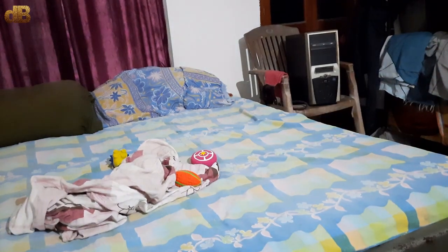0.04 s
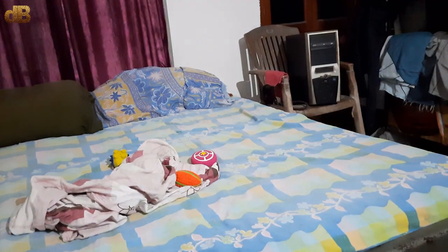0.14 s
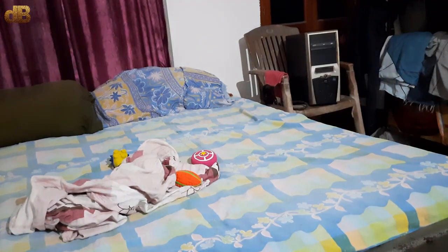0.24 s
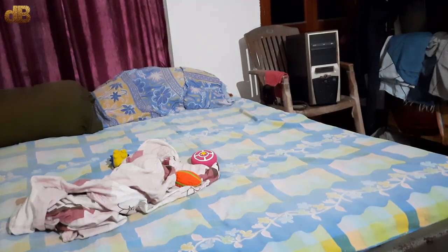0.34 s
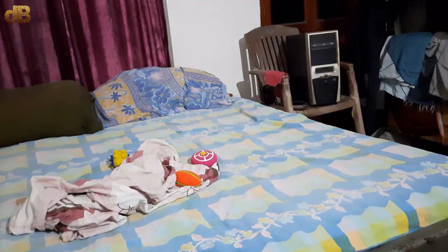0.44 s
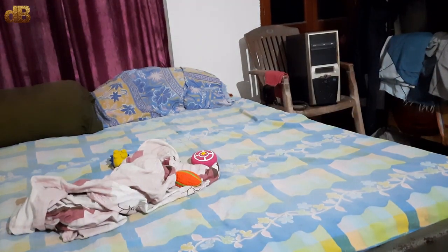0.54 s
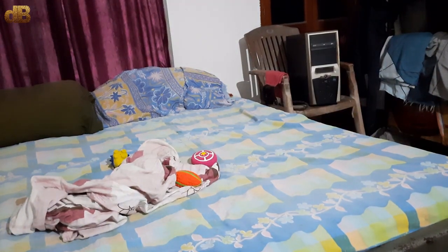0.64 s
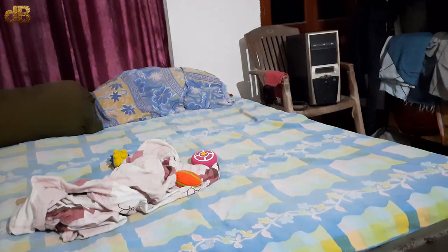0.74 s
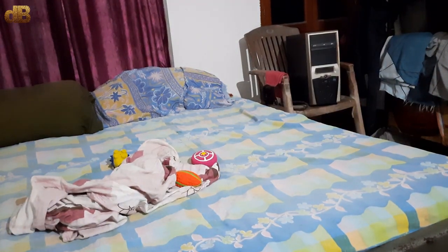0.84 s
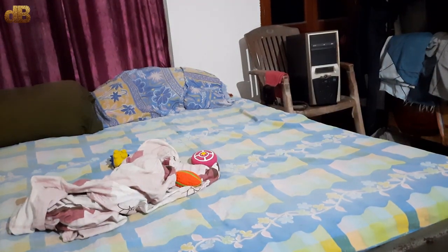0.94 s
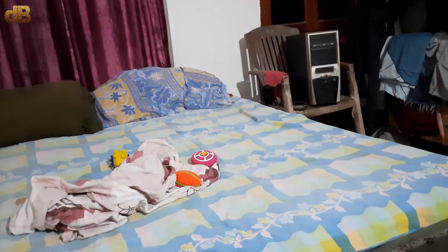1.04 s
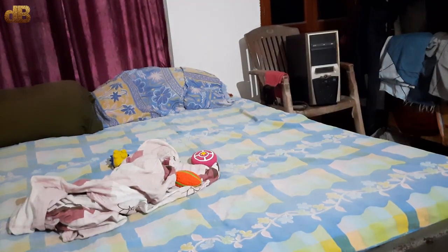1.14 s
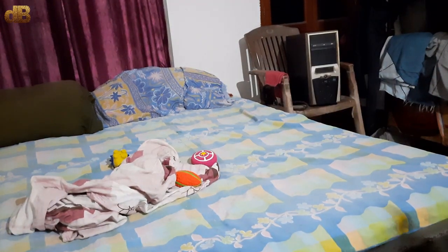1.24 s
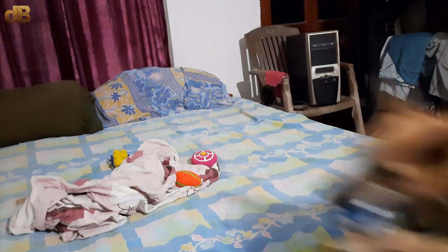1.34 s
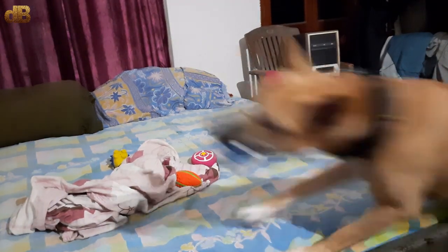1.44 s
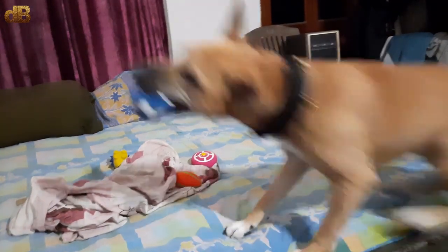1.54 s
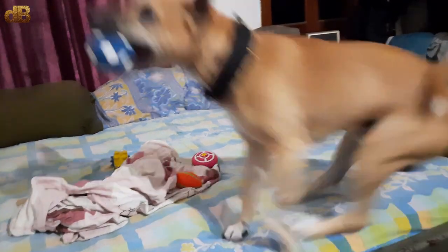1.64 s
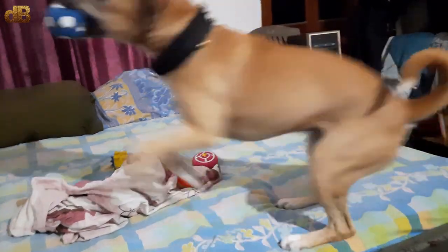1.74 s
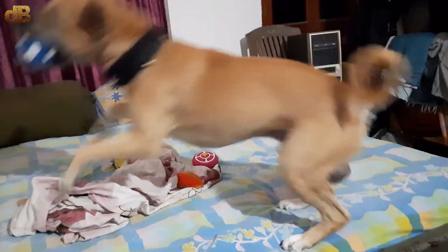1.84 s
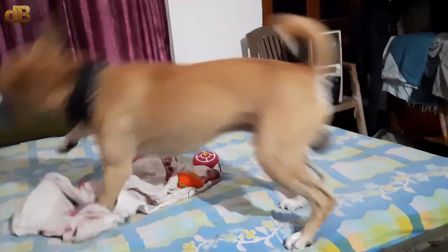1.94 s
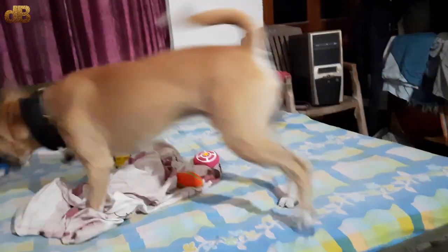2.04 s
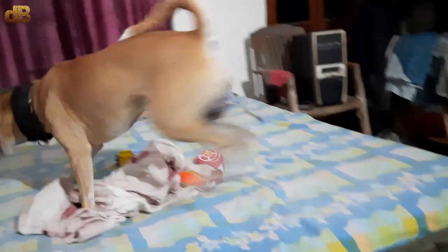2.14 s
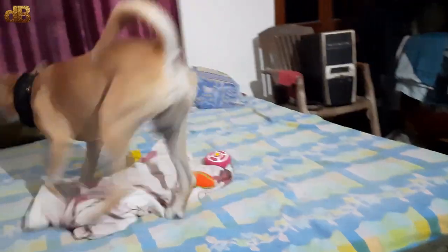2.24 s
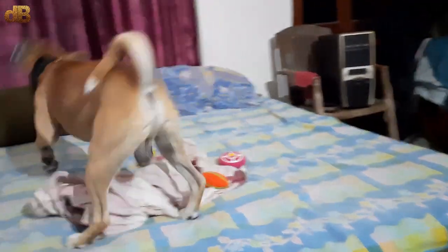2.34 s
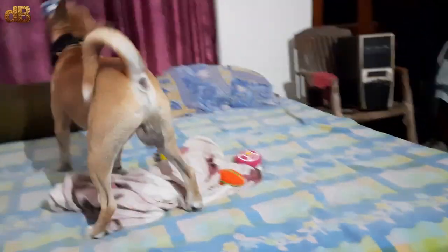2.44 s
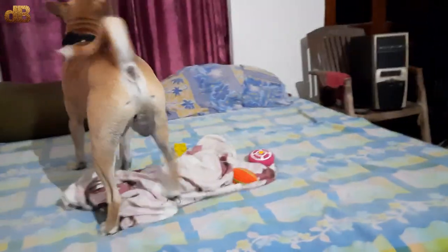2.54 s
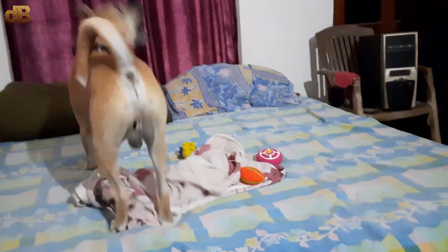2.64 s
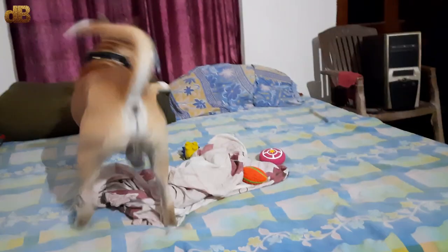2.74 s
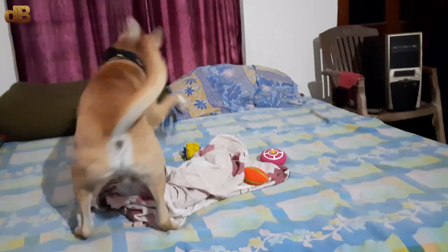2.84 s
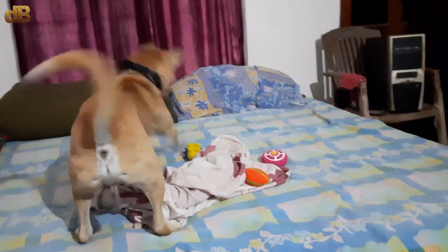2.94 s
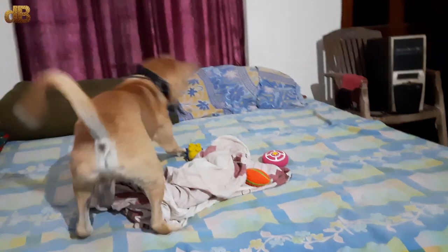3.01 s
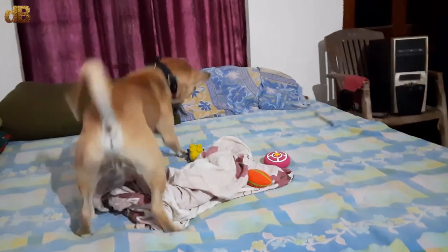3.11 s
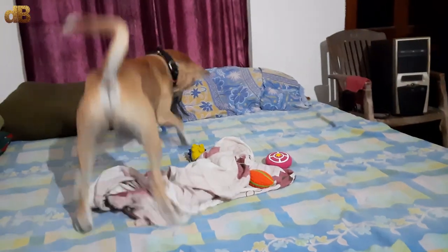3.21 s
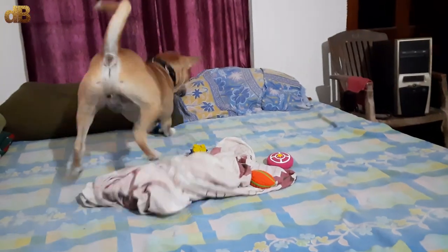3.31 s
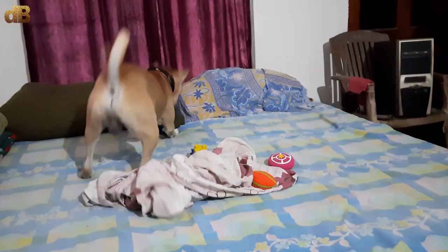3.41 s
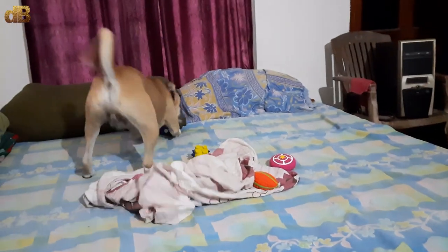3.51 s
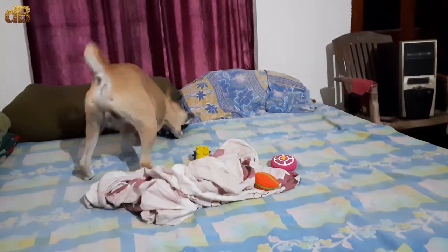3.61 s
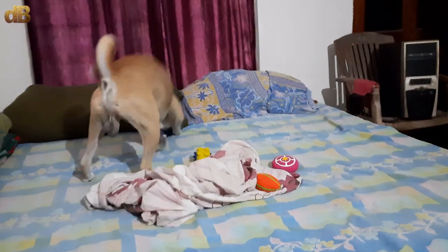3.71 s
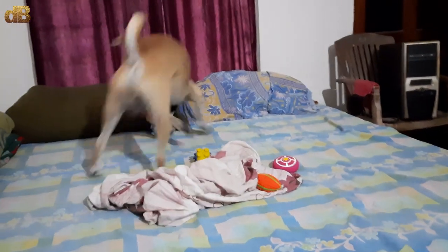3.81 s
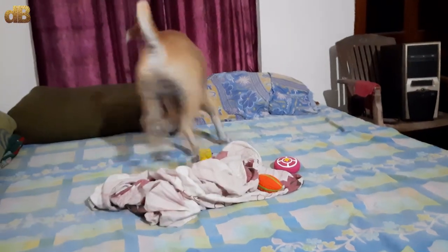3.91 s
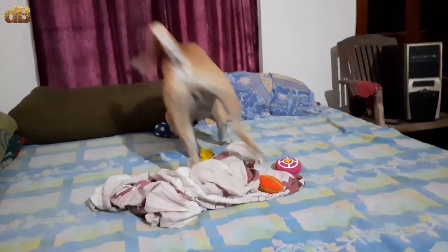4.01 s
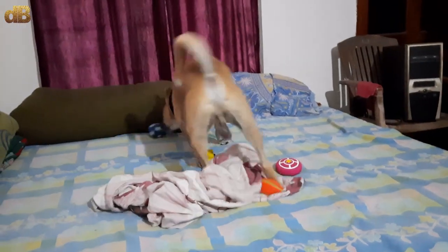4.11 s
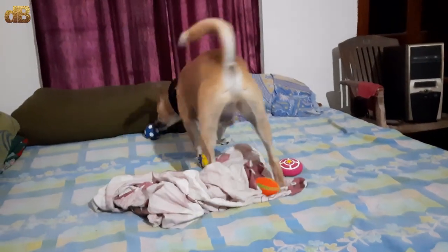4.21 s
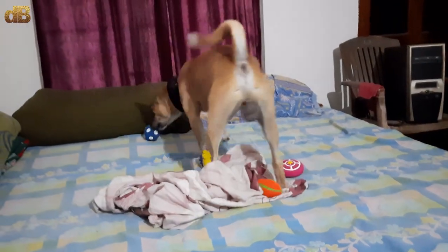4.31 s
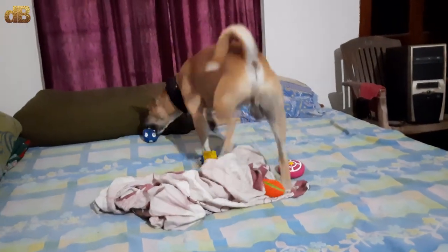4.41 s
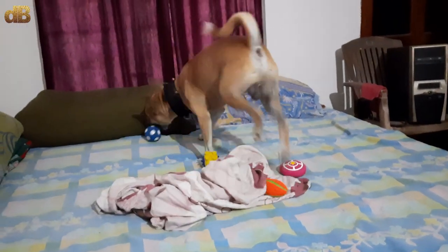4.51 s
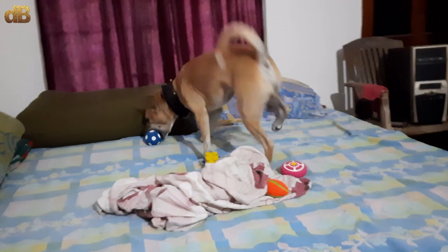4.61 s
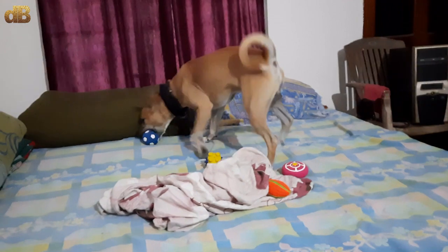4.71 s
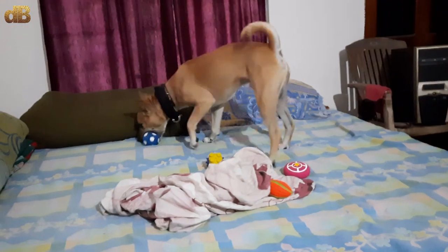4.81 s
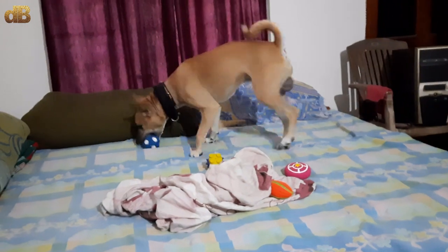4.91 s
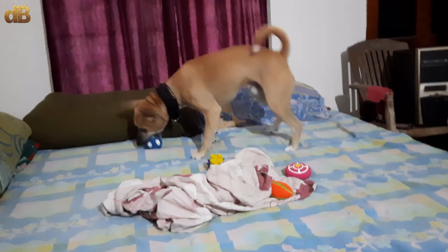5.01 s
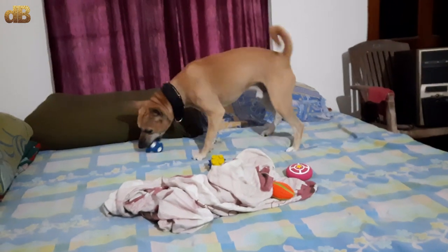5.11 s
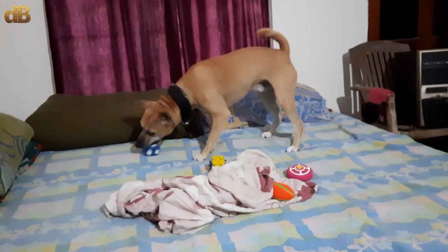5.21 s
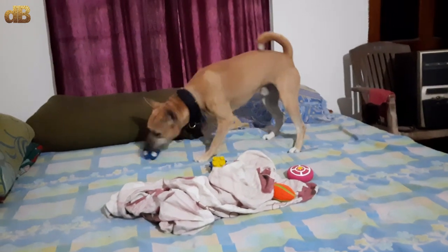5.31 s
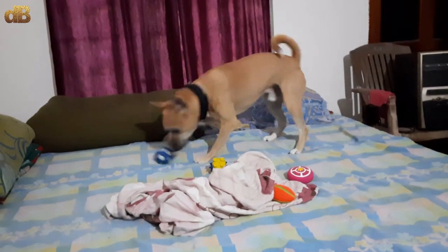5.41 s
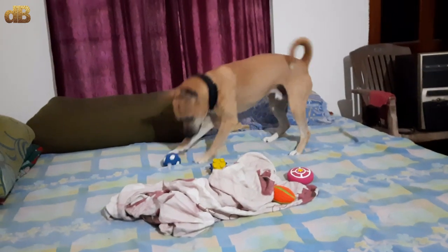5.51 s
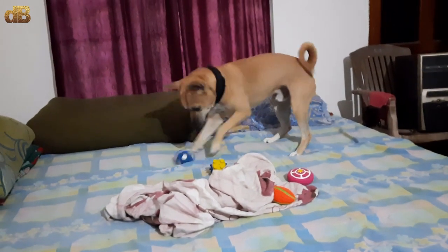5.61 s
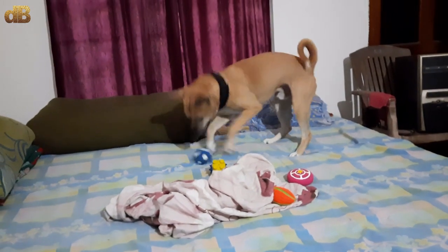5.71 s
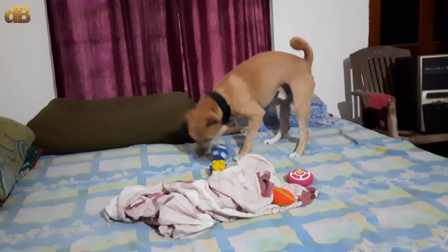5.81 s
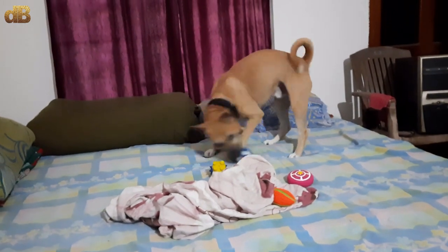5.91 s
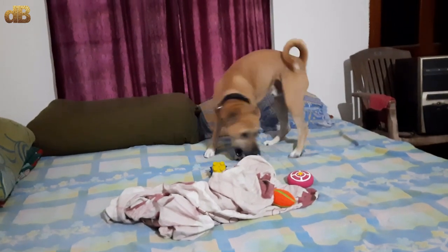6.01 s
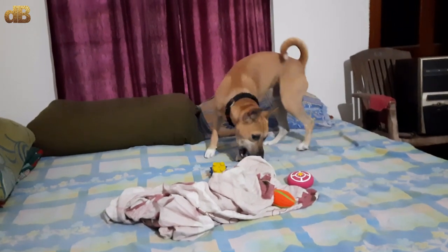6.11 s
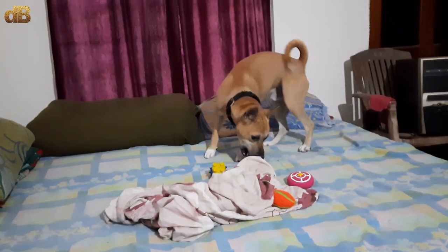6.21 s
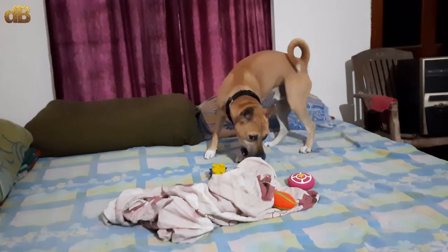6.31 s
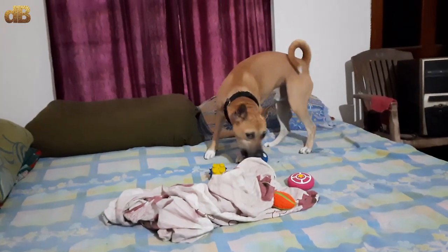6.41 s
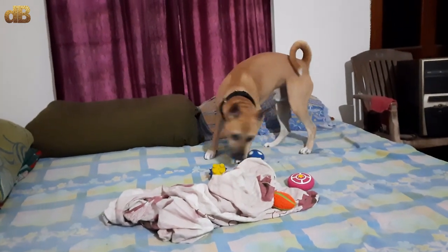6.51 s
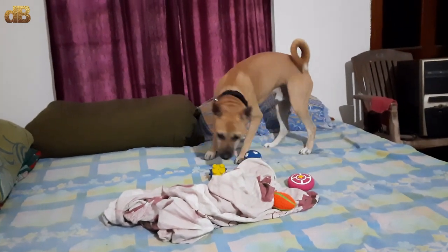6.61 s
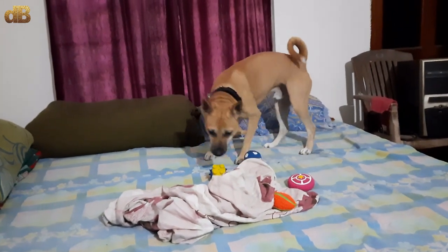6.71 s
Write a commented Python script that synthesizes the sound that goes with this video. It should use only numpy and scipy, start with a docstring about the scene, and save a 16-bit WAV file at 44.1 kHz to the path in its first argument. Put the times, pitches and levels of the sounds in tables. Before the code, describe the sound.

In a small bedroom with faint room hush and a thin fan whine, a dog's collar jingles as it approaches, then paws land softly on a mattress. Three bright rubber squeaks follow, spaced apart. Heavier thumps and dragging cloth surround a quick rubbery squeal and a weak squeak, before three more strong squeaks with thin air whistles. Stereo microphones sit close before the bed; the movement finally calms.

```python
"""A small bedroom, microphone pair just before the bed: a faint fan whine over the hush of the room.
A dog bounds about; paws thud on ringing mattress modes, and filtered noise makes the cloth rustle.
The collar jingles as struck metal modes, with a chatter of many tiny contacts.
Closest in interest is a rubber ball with a reed squeaker: bites blow short bright squeaks, harmonics
through fixed resonances; once the rubber squeals as it skids in the teeth, and leaking air whistles."""
import sys
import numpy as np
from scipy import signal
from scipy.fft import rfft, irfft
from scipy.io import wavfile

SR = 44100
rng = np.random.default_rng(int(sys.argv[2]) if len(sys.argv) > 2 else 0)


def to_wav(sig):
    """Store sig (one row per channel, or 1-D mono) as 16-bit WAV at the path in sys.argv[1].

    Samples outside -1..1 are clipped; the rate is SR.
    """
    pcm = np.clip(np.atleast_2d(sig), -1, 1) * 32767
    pcm = np.round(pcm).astype(np.int16)
    wavfile.write(sys.argv[1], SR, pcm.T)  # frames by channels


N = 297675
TIME = np.arange(N) / SR
EDGE_HZ = 16200  # upper limit of the recorder's band

# hush of the room: (frequency [Hz], relative level [dB])
HUSH_COLOUR = [(15, -50), (25, -32), (134, 0.5), (285, -12), (476, -21.5), (575, -19.5), (775, -0.5),
               (1330, -6.5), (2160, -10.5), (3340, -31), (5430, -30.5), (9570, -22), (16000, -19)]
HUSH_DB = -68.5
# whine of the fan: (time [s], level [dB])
FAN_LEVEL = [(0, -79.5), (.7, -69.5), (1.3, -72.5), (2.6, -76.5), (6.75, -78)]
FAN_HZ = 1310
# ring of the furnished bedroom: (frequency [Hz], t60 [s])
ROOM_DECAY = [(200, 0.42), (1200, 0.27), (2500, 0.34), (6000, 0.3), (10000, 0.27), (15000, 0.17)]
# likeness of left and right in that ring: (frequency [Hz], likeness [-1 to 1])
ROOM_LIKENESS = [(100, 1), (400, 0.99), (1200, -0.48), (2500, -0.17), (5000, -0.46), (7500, 0.87),
                 (12000, 0.88)]
# likeness of left and right in hush and bedding: (frequency [Hz], likeness [-1 to 1])
NOISE_LIKENESS = [(40, 1), (100, 0.82), (300, 0.91), (700, -0.042), (1300, -0.48), (3000, 0.27),
                  (7000, -0.66), (12000, .85)]
# how the microphone pair hears the toy: (frequency [Hz], phase by which left leads [rad])
LEFT_LEAD = [(300, -1.5), (1200, 1.2), (2500, 1.57), (5000, 1.82), (7000, 0.75), (9000, 0.6), (12000, 0),
             (16000, 1)]
# and its balance: (frequency [Hz], left minus right [dB])
LEFT_LEAN = [(300, 2), (1200, -5), (3700, -1), (6000, -2), (7400, -2.5), (8700, 3.5), (10000, 0),
             (16000, 1.5)]

# how much the dog stirs on the bed: (time [s], bedding dragged [dB], sheet sliding [dB])
STIRRING = [(0, -71.5, -67.5), (.5, -72, -70), (.85, -67.5, -65), (1.17, -74.5, -69), (1.5, -60.5, -60),
            (1.92, -65, -62), (2.3, -61, -68), (2.72, -65.5, -65.5), (3.05, -56.5, -60.5),
            (3.24, -64.5, -62.5), (3.6, -55.5, -58.5), (4.2, -58.5, -57), (4.39, -67, -56.5),
            (4.52, -57, -49.5), (4.8, -58, -59), (5.9, -57, -60.5), (6.27, -69.5, -68.5),
            (6.75, -72.5, -71.5)]
# footfalls and shoves: (time [s], push length [s], weight on the mattress [dB],
#                        scuff [dB], pat on the sheet [dB])
FOOTFALLS = [(0.597, 0.024, -76, -59, -70), (1.46, 0.065, -81, -61, -78), (1.526, 0.11, -55, -79, -45),
             (1.748, 0.064, -50, -66, -55), (2.000, 0.11, -49, -74, -58), (2.13, 0.036, -61, -63, -63),
             (2.314, 0.038, -47, -58, -65), (2.440, .09, -61, -86, -76), (2.821, .04, -53, -57, -65),
             (2.945, 0.12, -36.5, -46, -72), (3.035, 0.13, -44.5, -55, -51),
             (3.271, 0.091, -41.5, -52.5, -49.5), (3.347, 0.093, -44, -48, -65),
             (3.446, 0.022, -26, -43.5, -49), (3.598, 0.04, -45, -90, -74), (3.835, 0.044, -67, -51, -49.5),
             (4.087, 0.072, -41.5, -58, -56), (4.222, 0.057, -52, -61, -66.5), (4.492, 0.18, -79, -56, -52),
             (4.645, 0.067, -43, -58, -52), (5.029, 0.036, -60, -61, -55), (5.296, 0.014, -79, -60, -75),
             (5.668, 0.019, -44, -41, -59), (5.846, 0.024, -47, -83, -76), (5.983, 0.063, -65, -88, -63),
             (6.585, .02, -69, -74, -67.5)]
# a paw's push builds, holds, then dies away
PRESS_S, LIFT_S = 0.025, 0.03
# rumble of the loaded mattress: (frequency [Hz], relative level [dB])
RUMBLE_COLOUR = [(15, -39), (25, -18), (38, -1), (65, -3.5), (92, -1.5), (108, 3), (144, -9.5), (260, -9.5),
                 (340, -40), (570, -120)]
# dragged bedding: (frequency [Hz], relative level [dB])
SCUFF_COLOUR = [(90, -8.5), (170, -1.5), (260, -0.5), (420, -4), (650, -12), (1000, -17.5), (2000, -33.5),
                (4000, -38)]
# sliding sheet: (frequency [Hz], relative level [dB])
SWISH = [(400, -27.5), (800, 1), (1300, 8), (2000, -1.5), (3000, -11), (5000, -13.5), (9000, -12),
         (16000, -36.5)]
# swinging modes of the mattress: (frequency [Hz], relative level [dB], t60 [s])
MATTRESS_MODES = [(50.3, -11, 0.64), (82, -7.5, 0.064), (95.9, 2, 0.19), (124.4, -13.5, 0.23),
                  (196.4, -2, 0.074)]
# a paw landing on the taut sheet: (frequency [Hz], relative level [dB])
PAT_COLOUR = [(90, -11), (250, -5.5), (450, -2), (750, -4.5), (1200, -6), (2000, -11.5), (4000, -34),
              (9000, -45.5)]

# shakes of the neck that set the collar chattering and the cloth crackling:
# (start time [s], length [s], level [dB])
NECK_SHAKES = [(.12, 0.31, -65.5), (.66, 0.15, -53), (0.943, 0.11, -56), (1.23, 0.39, -52.5),
               (1.752, 0.14, -55.5), (2.92, 0.17, -61), (3.843, 0.18, -54.5), (3.993, 0.13, -51),
               (4.352, 0.4, -56), (4.705, 0.67, -59.5), (5.803, 0.34, -63.5)]
CHATTER_FOLLOW_DB = -6  # chatter under the shakes, relative to the dragging of the bedding
# colour of contact ticks and cloth crackle: (frequency [Hz], relative level [dB])
CONTACT_COLOUR = [(1500, -31.5), (3200, -24), (5000, -5.5), (7600, 3.5), (9500, -1), (11500, 0.5),
                  (13500, 4), (15500, -7.5), (16500, -0.5)]
# grain of the chatter: decay of a crackle, rate of the clumps, mean rate of the contacts
CRACKLE_S, CLUMP_HZ, CONTACTS_PER_S = 0.003, 18, 260
# knocks of the collar metal: (time [s], ring [dB], buckle [dB], contact tick [dB])
COLLAR_CLINKS = [(0.089, -48.5, -66, -49.5), (0.1173, -49, -78, -46), (0.5449, -48, -71, -61),
                 (0.584, -52, -74, -50), (0.6628, -53, -55, -43), (0.71, -55, -49.5, -40),
                 (0.8345, -44.5, -66, -47), (0.858, -44.5, -46.5, -54), (1.057, -57, -56, -44.5),
                 (1.218, -68, -48.5, -47), (1.268, -43, -50.5, -44), (1.346, -72, -43, -49),
                 (1.4532, -69, -46.5, -40.5), (1.5115, -74, -41, -41), (1.7607, -59, -42.5, -40),
                 (2.2718, -58, -53.5, -55), (2.938, -54, -50, -50), (3.542, -61, -54, -40.5),
                 (3.6538, -65, -62, -41), (3.839, -67, -60, -50), (4.0273, -68.5, -43, -44),
                 (4.5338, -66, -45, -56), (4.6249, -36.5, -55.5, -41), (4.7543, -59, -49.5, -56),
                 (5.4854, -58, -64, -47.5), (5.866, -51, -58, -45), (6.2586, -71, -56, -51),
                 (6.593, -54.5, -73, -62.5)]
# modes of the collar's ring: (frequency [Hz], relative level [dB], t60 [s])
RING_MODES = [(4680, -22.5, 0.14), (7600, -19, 0.15), (8380, -1, 0.032), (9200, -19, 0.35),
              (9500, -1.5, 0.14), (9740, -11, 0.17)]
# modes of its buckle: (frequency [Hz], relative level [dB], t60 [s])
BUCKLE_MODES = [(4400, -20.5, 0.13), (5680, -13.5, 0.055), (6640, -15, 0.25), (7600, -18, 0.05),
                (7477, -1, 0.08), (8100, 2.5, 0.044), (8190, 4, 0.14), (7920, -8, .08), (9050, -9.5, 0.089),
                (11100, -8, 0.054), (12930, -9, .1), (14400, -12, .12), (15368, -6.5, 0.16)]
# how unevenly a blow shares its energy among the modes
RING_SPREAD_DB, BUCKLE_SPREAD_DB = 2.5, 4.5

# air whistling thinly past the squeaker, one list per whistle: (time [s], frequency [Hz], level [dB])
AIR_WHISTLES = [
    [(4.87, 3210, -65), (4.92, 3374, -39), (4.99, 3180, -41.5), (5.03, 3400, -58)],
    [(5.19, 3330, -41), (5.24, 3176, -46.5), (5.32, 3305, -46.5), (5.39, 3340, -53.5)],
    [(5.58, 3210, -50), (5.70, 3334, -49.5), (5.86, 3320, -72)],
]
# rubber sticking and slipping on the teeth: (time [s], pitch [Hz], level [dB], roughness [0-1],
#                                             brightness [dB per octave])
SKID_PATH = [(3.298, 1248, -48, 0.77, 4), (3.308, 1650, -42.5, 0.57, -3), (3.322, 2146, -34, 0.76, 2),
             (3.335, 2960, -31, 0.59, -5.5), (3.362, 2910, -28, 0.49, -3.5), (3.379, 2455, -35.5, 0.72, -2),
             (3.390, 1749, -29.5, 0.63, 1), (3.406, 1280, -44.5, 0.9, -5.5), (3.450, 1200, -41, 0.58, -1)]
# resonances of the skidding rubber: (frequency [Hz], relative level [dB])
RUBBER_COLOUR = [(700, -12.5), (1500, -8), (2900, -5), (4200, 0.5), (5800, 2.5), (8600, -3), (11500, -15.5),
                 (15500, -24)]
# bites; the last two rows overlap, as the hard last bite also wakes a lower mode of the reed:
# (start time [s], catch [s], squeeze [s], release [s], pitch [Hz], droop [Hz per s], level [dB],
#  swell over the squeeze [dB], roughness [0-1], brightness [dB per octave], fundamental [dB],
#  even harmonics [dB], ring-on [dB])
BALL_BITES = [ (1.559, 0.0029, .083, .026, 1218, -380, -18.5, -8.5, 0.1, 0, 0.5, 1, -53.5),
              (1.972, 0.0011, 0.065, .044, 1222, -100, -23.5, -2, 0, 2, 11, 0.5, -43.5),
              (2.415, 0.0037, .040, .022, 1211, 0, -27, 3.5, 0.12, 0.5, 2, -4.5, -32),
              (3.704, 0.00305, 0.022, 0.042, 1269, 1587, -43.5, -2, 0.45, -6.5, -11, -7, -68),
              (4.927, .0011, 0.036, 0.041, 1237, 0.5, -23.5, 4.5, .1, 0.5, -4, -1, -52),
              (5.156, 0.0014, .120, 0.033, 1240, 68, -23, -5.5, 0.16, 0.5, -3, -1.5, -45),
              (5.545, 0.0063, .104, .035, 1317, 999.5, -28, -10.5, 0.35, 1, -4.5, -0.5, -47),
              (5.555, .006, .100, .022, 1248, 463.5, -25.5, -2, 0.2, -1, -7.5, -2.5, -58), ]
# resonances of the squeaker: (frequency [Hz], relative level [dB])
REED_COLOUR = [(1200, -9), (2450, -12), (3660, -12.5), (4900, -8), (6150, -0.5), (7300, 3), (8650, -7.5),
               (9800, -9.5), (11100, -8), (12400, -8), (13700, -14.5), (15000, -20.5), (16200, -41.5)]
# hiss of air through the reed: (frequency [Hz], relative level [dB])
HISS_COLOUR = [(1000, -28), (2500, -36.5), (4300, -36.5), (5600, -18.5), (6800, 4.5), (8000, -8),
               (9500, -18), (12000, -12.5), (16000, -30.5)]
# where the ball is as the dog crosses the bed: (time [s], left minus right [dB])
BALL_PLACE = [(1.6, 1), (2.05, 1.5), (2.5, 0), (3.4, 0), (5, 0), (5.7, -.3)]
# the reed catches: it starts flat (fraction of the pitch), weak and rough, and settles within moments
CATCH_FLAT, CATCH_DB, CATCH_ROUGH = 0.16, -30, 0.52
ARCH = 0.007  # fraction by which the pitch arches up in the middle of the squeeze
# the air runs out: by the end of the release the note is flat, weak, rough and duller (dB per octave)
SAG, SAG_DB, SAG_ROUGH, SAG_DULL_DB = 0.105, -16, 0.55, -5.5
# pitch, loudness and treble hold up at first, then give way
SAG_POWER, FADE_POWER, DULL_POWER = 1.6, 2.2, 3.0
# unsteady pressure of the jaws: level, fraction of the pitch, rate
JAW_DB, JAW_PITCH, JAW_HZ = 2.5, 0.003, 25.8


def amp(db):
    """Decibels to gain."""
    return 10 ** (np.asarray(db) / 20)


def evened(x):
    """Scales to rms 1."""
    return x / np.sqrt(np.mean(x ** 2) + 1e-20)


def read(points, hz):
    """Reads a spectrum on a log-frequency axis."""
    f, value = np.transpose(points)
    return np.interp(np.log(hz + 1), np.log(f + 1), value)


def level(rows, axis=1):
    """Gain at every sample from one dB column of a curve."""
    rows = np.asarray(rows)
    return amp(np.interp(TIME, rows[:, 0], rows[:, axis]))


def add(mix, s, sound):
    """Mixes a sound in at a time in seconds."""
    part = mix[max(round(s * SR), 0):][:len(sound)]
    part += sound[:len(part)]


def tint(x, colour):
    """Gives a signal a spectrum, at rms 1."""
    size = x.shape[-1]
    gain = amp(read(colour, np.fft.rfftfreq(size, 1 / SR)))
    return evened(irfft(rfft(x) * gain, size))


def wander(size, hz):
    """Smooth chance up to a rate, rms 1."""
    f = np.fft.rfftfreq(size, 1 / SR)
    return evened(irfft(rfft(rng.standard_normal(size)) / (1 + (f / hz) ** 4), size))


def pair(two, likeness):
    """Blends two unrelated signals into left and right, alike by frequency."""
    size = two.shape[-1]
    a, b = rfft(two)
    same = np.clip(read(likeness, np.fft.rfftfreq(size, 1 / SR)), -1, 1)
    mid = a * np.sqrt((1 + same) / 2)
    side = b * np.sqrt((1 - same) / 2)
    return irfft(np.array([mid + side, mid - side]), size)


def noise(colour):
    """Coloured stereo noise."""
    return tint(pair(rng.standard_normal((2, N)), NOISE_LIKENESS), colour)


def struck(modes, t, spread_db, detune=0.0014):
    """Dying modes; each blow lands elsewhere and shares its energy differently."""
    hz, db, t60 = np.transpose(modes)[:, :, None]
    size = amp(db + spread_db * rng.standard_normal(db.shape))
    size = size / np.linalg.norm(size)
    hz = hz * (1 + detune * rng.standard_normal(hz.shape))
    return (size * amp(-60 * t / t60) * np.sin(2 * np.pi * hz * t)).sum(0)


def background(waver=0.7):
    """Room hush and the thin whine of a fan, its strength wavering separately left and right."""
    tone = np.cos(2 * np.pi * FAN_HZ * TIME)
    whine = [evened((1 + waver * wander(N, 45)) * tone) for _ in range(2)]
    return amp(HUSH_DB) * noise(HUSH_COLOUR) + level(FAN_LEVEL) * np.array(whine)


def room(x, wet_db, gap_s=0.0028, build_s=0.0046):
    """Direct sound plus the short ring of a furnished bedroom: noise dying by frequency."""
    burst = pair(rng.standard_normal((2, SR // 2)), ROOM_LIKENESS)
    hz, t, z = signal.stft(burst, SR, nperseg=256)
    t60 = read(ROOM_DECAY, hz)[:, None]
    tail = signal.istft(z * amp(-60 * t / t60), SR, nperseg=256)[1]
    tail = tail * np.clip((np.arange(tail.shape[1]) / SR - gap_s) / build_s, 0, 1)
    tail = tail / np.linalg.norm(tail[0])
    return x + amp(wet_db) * signal.fftconvolve(x[None], tail, axes=1)[:, :N]


def ports(x):
    """The two microphone ports hear the toy with different phase and level."""
    hz = np.fft.rfftfreq(N, 1 / SR)
    # each port takes half of the difference
    half = amp(read(LEFT_LEAN, hz) / 2) * np.exp(0.5j * read(LEFT_LEAD, hz))
    return irfft(rfft(x) * np.array([half, 1 / half]), N)


def bedding(stir_rumble_db=-3, push_rumble_db=-6, grain_db=0.5):
    """The mattress rumbles and the cloth drags in uneven slips, more while a paw pushes."""
    drag = level(STIRRING, axis=1)
    load = amp(stir_rumble_db) * drag
    t = np.arange(SR // 2) / SR
    for s, length, weight_db, scuff_db, _ in FOOTFALLS:
        push = np.minimum(t / PRESS_S, 1) * np.exp(-np.maximum(t - length, 0) / LIFT_S)
        add(load, s, amp(weight_db + push_rumble_db) * push)
        add(drag, s, amp(scuff_db) * push)
    slips = amp(grain_db * wander(N, 60))
    swish = level(STIRRING, axis=2) * noise(SWISH) * np.sqrt(slips)
    return load * noise(RUMBLE_COLOUR) + drag * noise(SCUFF_COLOUR) * slips + swish


def paws(rise_s=0.0057, pat_s=0.038, thud_db=3.5):
    """Each paw pats the sheet and sinks in, setting the mattress swinging."""
    out = np.zeros(N)
    t = np.arange(SR // 2) / SR
    for s, _, weight_db, _, pat_db in FOOTFALLS:
        thud = struck(MATTRESS_MODES, t, 1.5) * (1 - np.exp(-t / rise_s))
        pat = tint(rng.standard_normal(len(t)), PAT_COLOUR) * np.exp(-t / pat_s)
        add(out, s, amp(weight_db + thud_db) * thud + amp(pat_db) * pat)
    return out


def shaking():
    """Strength of the chatter: each shake swells and fades over the dog's general stirring."""
    out = amp(CHATTER_FOLLOW_DB) * level(STIRRING, axis=1)
    for s, length, db in NECK_SHAKES:
        add(out, s, amp(db) * np.sin(np.pi * np.arange(0, length, 1 / SR) / length))
    return out


def chatter(spread_db=4.0, metal_db=-10, cloth_db=-6, clump_db=3.5):
    """Many tiny contacts, louder in clumps: some ring the buckle, the rest are dry crackles of cloth."""
    t = np.arange(SR // 4) / SR
    sizes = rng.standard_normal((2, N)) * amp(spread_db * np.minimum(rng.exponential(1, (2, N)), 3))
    contacts = rng.random((2, N)) < CONTACTS_PER_S / SR
    clicks = sizes * contacts * amp(clump_db * np.tanh(wander(N, CLUMP_HZ)))
    metal = evened(signal.oaconvolve(clicks[0], struck(BUCKLE_MODES, t, 0.76))[:N])
    grain = rng.standard_normal(len(t)) * np.exp(-t / CRACKLE_S)
    crackle = tint(signal.oaconvolve(clicks[1], grain)[:N], CONTACT_COLOUR)
    return shaking() * (amp(metal_db) * metal + amp(cloth_db) * crackle)


def collar(tick_s=0.0015, rattle_db=-14, rattle_s=0.017):
    """Ring and buckle knock together: a tick and a brief rattle, while both ring on."""
    out = np.zeros(N)
    t = np.arange(SR // 2) / SR
    touch = np.exp(-t / tick_s) + amp(rattle_db) * np.exp(-t / rattle_s)
    for s, ring_db, buckle_db, tick_db in COLLAR_CLINKS:
        ring = amp(ring_db) * struck(RING_MODES, t, RING_SPREAD_DB)
        buckle = amp(buckle_db) * struck(BUCKLE_MODES, t, BUCKLE_SPREAD_DB)
        tick = amp(tick_db) * tint(rng.standard_normal(len(t)), CONTACT_COLOUR) * touch
        add(out, s, ring + buckle + tick)
    return out


def whistle(rows):
    """Leaking air: one thin sine, gliding in pitch and slightly unsteady."""
    s, hz, db = np.transpose(rows)
    t = np.arange(s[0], s[-1], 1 / SR)
    turns = np.cumsum(np.interp(t, s, hz) * (1 + 0.003 * wander(len(t), 120))) / SR
    fade = signal.windows.tukey(len(t), 0.1)
    return s[0], amp(np.interp(t, s, db)) * np.sin(2 * np.pi * turns) * fade


def squeak(hz, db, rough, bright_db, colour, hiss_colour, jitter, flutter_hz, air, pinch,
           root_db=0, even_db=0):
    """A stack of harmonics through fixed resonances; flutter and pulsed hiss roughen it."""
    t = np.arange(len(hz)) / SR
    flutter = jitter * rough * np.sqrt(rough) * wander(len(t), flutter_hz)
    turns = np.cumsum(hz * (1 + flutter)) / SR
    k = np.arange(1, 17)[:, None]  # harmonic numbers
    # as the note loses its grip, the sound narrows onto the strongest resonance
    shape_db = read(colour, k * hz) * (1 + pinch * rough) + bright_db * np.log2(k)
    size = amp(shape_db + root_db * (k == 1) + even_db * (k % 2 == 0)) * (k * hz < EDGE_HZ)
    harmonics = size * np.cos(2 * np.pi * (k * turns + rng.random(k.shape)))
    tone = harmonics.sum(0) / np.sqrt((size ** 2).sum(0) / 2)
    # one puff of hiss in each cycle of the note
    hiss = tint(rng.standard_normal(len(t)) * (1 + np.cos(2 * np.pi * turns)), hiss_colour)
    edges = np.clip(np.minimum(t, t[-1] - t) / 0.0007, 0, 1)
    return amp(db) * edges * (tone + air * rough ** 2 * hiss)


def skid():
    """Rubber slips on the teeth: a rough squeal that climbs, then slides down."""
    s, *columns = np.transpose(SKID_PATH)
    t = np.arange(s[0], s[-1], 1 / SR)
    hz, db, rough, bright_db = (np.interp(t, s, column) for column in columns)
    return s[0], squeak(hz, db, np.clip(rough, 0, 1), bright_db, RUBBER_COLOUR, RUBBER_COLOUR,
                        jitter=0.057, flutter_hz=430, air=1.04, pinch=0.089)


def bite(catch_s, squeeze_s, release_s, pitch_hz, droop, level_db, swell_db, roughness, bright_db,
         root_db, even_db):
    """The reed catches, sounds while the jaws press, and sags as the air runs out."""
    t = np.arange(0, squeeze_s + release_s, 1 / SR)
    catch = np.exp(-t / catch_s)
    spent = np.maximum(t - squeeze_s, 0) / release_s
    press = np.minimum(t / squeeze_s, 1) - 0.5  # -0.5 to 0.5 over the squeeze
    jaw = wander(len(t), JAW_HZ)
    bend = ARCH * np.cos(np.pi * press) - CATCH_FLAT * catch - SAG * spent ** SAG_POWER + JAW_PITCH * jaw
    hz = (pitch_hz - droop * squeeze_s * press) * (1 + bend)
    db = level_db + swell_db * press + CATCH_DB * catch + SAG_DB * spent ** FADE_POWER + JAW_DB * jaw
    rough = np.clip(roughness + CATCH_ROUGH * catch + SAG_ROUGH * spent, 0, 1)
    bright_db = bright_db + SAG_DULL_DB * spent ** DULL_POWER
    return squeak(hz, db, rough, bright_db, REED_COLOUR, HISS_COLOUR, jitter=0.045, flutter_hz=267,
                  air=1.2, pinch=0.073, root_db=root_db, even_db=even_db)


def ring_on(pitch_hz, db, peak_s=0.013, flat=0.024):
    """The lowest note rings on softly, a little flat, as the squeak lets go."""
    t = np.arange(SR // 4) / SR
    swell = (t / peak_s * np.exp(1 - t / peak_s)) ** 2
    return amp(db) * swell * np.sin(2 * np.pi * pitch_hz * (1 - flat) * t)


def ball():
    """Squeaks, one skid, and thin whistles of leaking air."""
    out = np.zeros(N)
    for s, catch_s, squeeze_s, release_s, pitch_hz, *voice, ring_db in BALL_BITES:
        add(out, s, bite(catch_s, squeeze_s, release_s, pitch_hz, *voice))
        add(out, s + squeeze_s + release_s / 2, ring_on(pitch_hz, ring_db))
    add(out, *skid())
    for rows in AIR_WHISTLES:
        add(out, *whistle(rows))
    return out


def scene():
    """Toy and collar sound into the room; the bed lies just before the microphones."""
    bed = (bedding() + paws()) * amp([[-0.6], [0.6]])  # left, right
    jingle = room(collar() + chatter(), wet_db=4.5) * amp([[-2.5], [0]])
    lean = np.sqrt(level(BALL_PLACE, axis=1))
    toy = ports(room(ball(), wet_db=-0.5)) * np.array([lean, 1 / lean])
    return background() + bed + jingle + toy


def record(dry, bass_hz=42):
    """The microphones lose the deepest bass; then the recorder's band limit."""
    highpass = signal.butter(4, bass_hz, "highpass", fs=SR, output="sos")
    thinned = signal.sosfilt(highpass, dry)
    lowpass = signal.firwin(511, EDGE_HZ, window=("kaiser", 9), fs=SR)
    return signal.oaconvolve(thinned, lowpass[None], "same")


dry = scene()
out = record(dry)
to_wav(out)
```